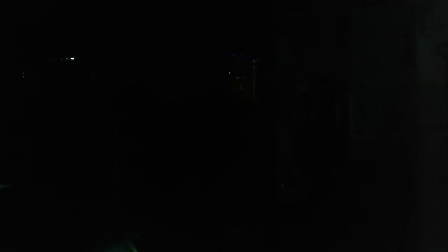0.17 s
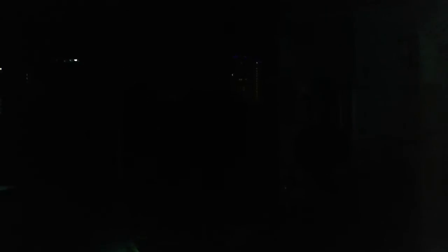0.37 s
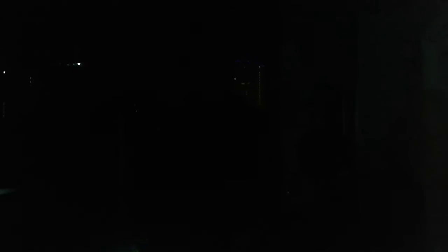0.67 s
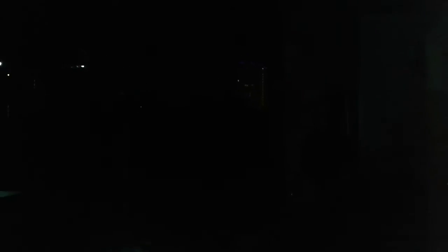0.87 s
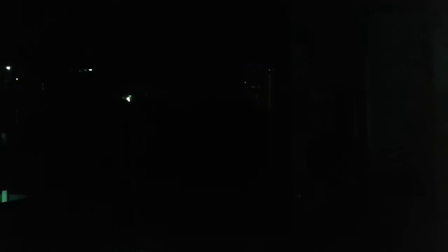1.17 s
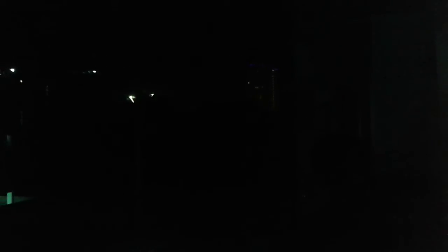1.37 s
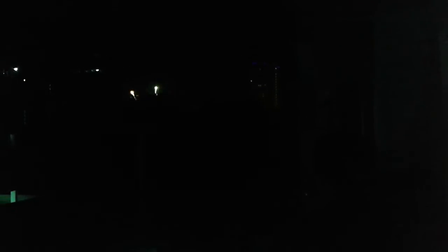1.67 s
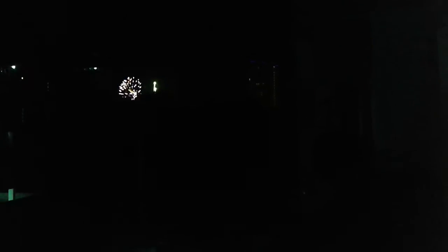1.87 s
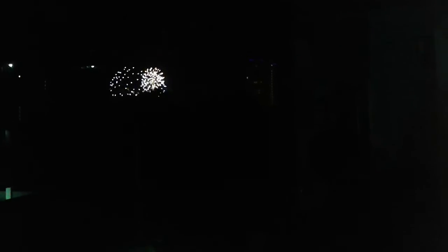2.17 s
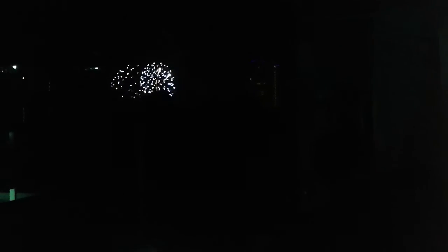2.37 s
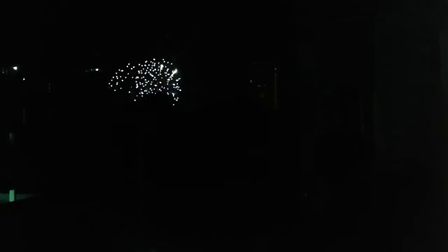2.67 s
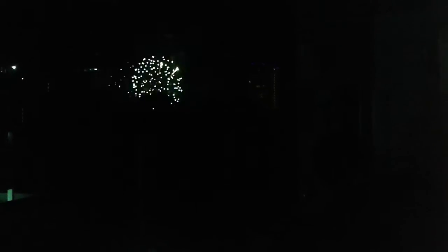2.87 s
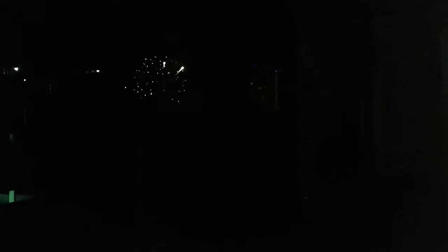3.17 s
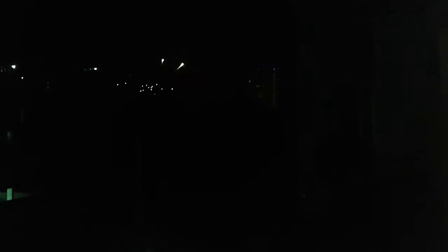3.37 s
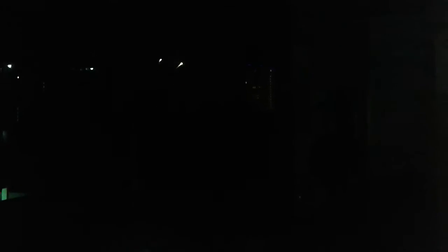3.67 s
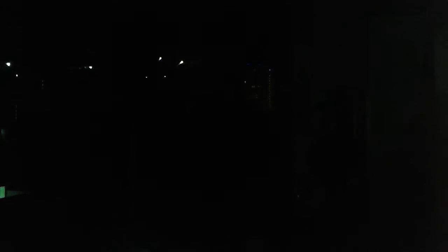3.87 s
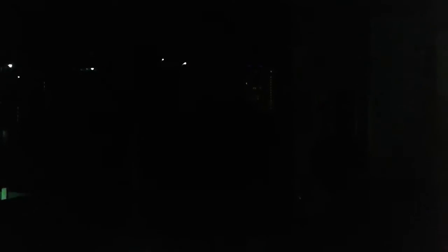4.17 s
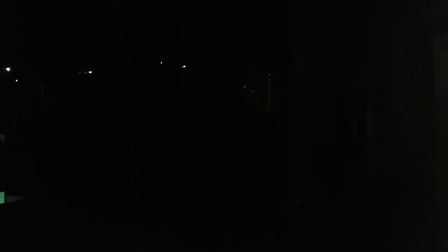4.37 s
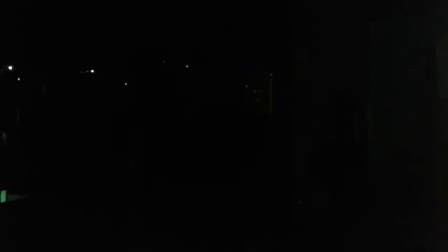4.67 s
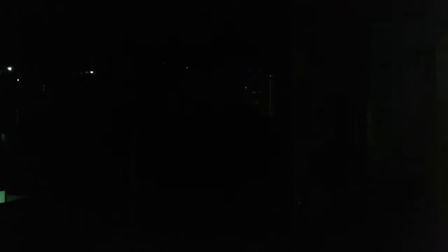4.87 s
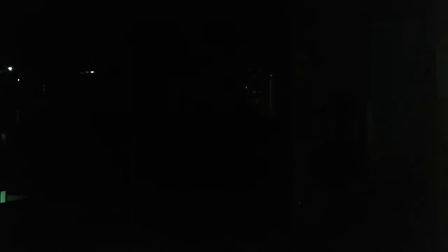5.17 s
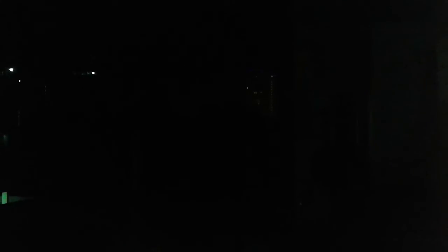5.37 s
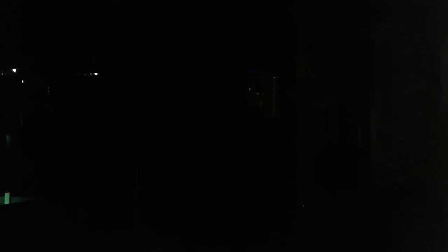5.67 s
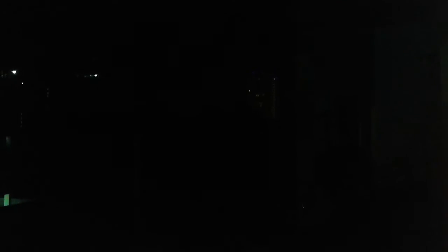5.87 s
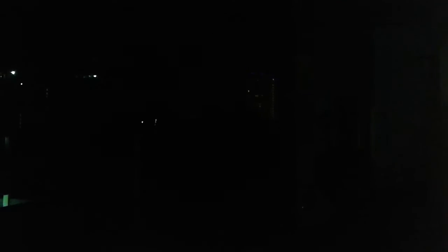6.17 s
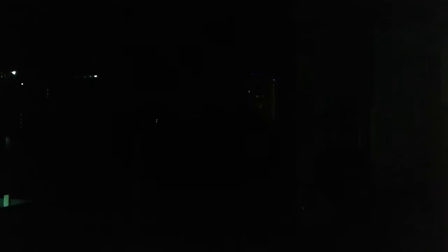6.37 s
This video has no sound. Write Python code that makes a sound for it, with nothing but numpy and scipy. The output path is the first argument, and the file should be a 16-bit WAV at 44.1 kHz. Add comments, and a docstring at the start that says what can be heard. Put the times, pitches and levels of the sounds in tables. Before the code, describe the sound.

Fireworks boom in two quick clusters, rolling away across a town and trailing into crackles, while night insects chirr softly.

```python
"""Aerial firecrackers over a town at night, heard from a porch: two volleys of three bangs, then crackling
stars. Each blast, a pressure push led by a shock front, booms in the porch, slaps back off house fronts and
rolls away between the buildings. Crickets and a katydid stroke their wings over the town's hum. The loudest
bangs overload the recorder with a treble click; its gain control ducks at the sharp peaks of loud bangs.
Fainter: stars between the volleys, dry pops and the loudest star snaps, two swells of hiss, a far whine that
stops."""
import sys
import numpy as np
from scipy import signal
from scipy.fft import rfft, irfft, next_fast_len
from scipy.io import wavfile
from scipy.ndimage import uniform_filter1d, minimum_filter1d, map_coordinates

SR = 44100
rng = np.random.default_rng(int(sys.argv[2]) if len(sys.argv) > 2 else 0)


def master_out(mix):
    """Clip the mix to full scale and print it as 16-bit PCM to the path in sys.argv[1]."""
    frames = np.transpose(np.atleast_2d(mix))
    ceiling = np.clip(frames, -1, 1)
    pcm = np.round(ceiling * 32767).astype(np.int16)
    wavfile.write(sys.argv[1], SR, pcm)


N = 287796
TIME = np.arange(N) / SR

# near crickets: (stroke rate [1/s], start [Hz], fall [Hz], duty [ratio], level [dB], echo gain [ratio])
CRICKET_SONGS = [(14.8, 6650, 820, 0.55, -57, 1.15), (14, 6450, 540, 0.59, -62, 0.66),
                 (9.5, 7500, 140, 0.49, -62, 3.1)]
# katydid wing resonance: (frequency [Hz], level [dB])
WING_SPECTRUM = [(8400, -18), (9000, -4.5), (9600, -2.5), (10300, -2.5), (11000, -6.5), (12600, -16)]
# far insects: (frequency [Hz], level [dB])
CHORUS_SPECTRUM = [(3000, -46), (5000, -32), (5700, -2.5), (6200, -5.5), (6900, -2), (7450, 1.5),
                   (8200, -20.5), (9200, -8), (10300, -6.5), (11500, -14), (13000, -17), (15000, -19)]
# town hum: (frequency [Hz], level [dB])
TOWN_SPECTRUM = [(15, -46), (25, -14), (71, -18), (126, 0), (210, -5.5), (240, -3), (327, -16), (477, -13),
                 (545, -19.5), (680, -19), (1010, -25), (1210, -27), (2200, -31), (2570, -33.5),
                 (5000, -33.5), (6500, -24), (11000, -120)]
# far whine: (frequency [Hz], level [dB])
WHINE_SPECTRUM = [(1700, -40), (2050, -15), (2170, -6), (2320, -13), (2800, -39)]
# hiss swells: (time [s], level [dB], spread [s], centre [Hz], width [octaves])
HISS_SWELLS = [(.14, -59, 0.09, 3600, 0.73), (3.56, -52, 0.085, 5800, .3)]
# bursts: (time [s], blast [dB], crack re blast [dB], push length [s], overload re blast [dB], street [dB])
BURSTS = [(0.8678, 6.5, 0.5, 0.0018, -47, 7), (0.9327, 7, 1.5, 0.0017, -44, 8),
          (1.0133, 2, 1, 0.0023, -48, 1), (4.5606, 6.5, -1, 0.0011, -30, 3.5),
          (4.786, 15, -1.5, 0.00069, -15.5, 4.5), (4.8689, 7.5, 5.5, 0.0016, -34, 7.5)]
# shock front: (frequency [Hz], level [dB])
CRACK_SPECTRUM = [(200, 3.5), (800, 11.5), (1250, -0.5), (1850, 5.5), (2900, -2.5), (4000, 2), (4800, -0.5),
                  (5900, 3), (6600, -7.5), (8000, -20.5), (12000, -51), (16000, -64)]
# treble click of the recorder overloading: (frequency [Hz], level [dB])
OVERLOAD_SPECTRUM = [(2000, -9), (6000, -11), (8000, -9), (10000, -1), (12000, -6), (15000, -11)]
# hard faces passing on the crack, small ones only short waves: (delay [s], gain [dB], low cut [Hz])
HARD_FACES = [(0, 0.5, 150), (.0017, 2.5, 200), (.005, -4.5, 1000), (0.0112, 5, 2200)]
# porch walls returning the push: (delay [s], gain [dB], high cut [Hz])
PORCH_WALLS = [(.0045, 0.5, 154), (.0059, 1.5, 152), (0.0137, 4, 156), (0.0191, -2, 172), (0.026, -7, 525),
               (.033, 1.5, 325), (.043, -2.5, 150)]
# porch air resonances: (centre [Hz], width [Hz], gain [dB])
PORCH_MODES = [(132.7, 12.4, 19), (198.6, 41.5, 12.5), (243, 8.4, 21.5), (430.2, 13, 12.5),
               (458, 4.6, 17.5), (624, 51, 13), (679, 4.95, 23.5), (1140, 16.3, 17.5), (1221, 30, 15.5)]
# porch reverberation: (frequency [Hz], level [dB])
SCATTER_SPECTRUM = [(80, -26), (200, -2.5), (450, 3.5), (700, -1), (1300, -10), (2500, -17.5), (5800, -18),
                    (7000, -27), (9000, -45.5), (16000, -85)]
# porch decay: (frequency [Hz], T60 [s])
PORCH_DECAY = [(100, 0.46), (500, 0.35), (2000, 0.25), (6000, 0.32), (12000, 0.21)]
# low far echoes: (frequency [Hz], level [dB])
RUMBLE_SPECTRUM = [(25, -37), (60, -16.5), (100, -8), (135, 0.5), (170, -3), (215, 0), (330, -14),
                   (440, -9), (540, -26), (640, -16), (900, -24.5), (1500, -30.5), (4000, -56)]
# bright street echoes: (frequency [Hz], level [dB])
WASH_SPECTRUM = [(150, -24), (450, 8), (700, 2), (1200, -2.5), (1600, -4), (2300, -7), (3000, -10),
                 (5600, -9.5), (7000, -18.5), (9000, -50), (16000, -60)]
# buildings swelling each roll: (delay [s], spread [s], rumble gain [dB], wash gain [dB])
BUILDINGS = [(.31, 0.037, 5.5, 11), (.74, 0.16, 2, 2), (1.8, 0.29, 3, -2)]
# house-front echoes: (time [s], level [dB], spread [s])
HOUSE_SLAPS = [(1.147, -14, 0.0075), (1.277, -13.5, 0.0046), (1.571, -27, 0.0042), (5.018, -18.5, 0.0039),
               (5.073, -21, 0.004), (5.149, -10, 0.0052)]
# star clouds: (peak time [s], level [dB], rise [dB/s], fall [dB/s])
STAR_CLOUDS = [(2.87, -52.5, 13, 26), (6.17, -33, 29.5, 33.5)]
# star snaps: (frequency [Hz], level [dB])
PATTER_SPECTRUM = [(290, -50), (500, -7), (660, -4), (793, -4.5), (984, -8.5), (1150, -4.5), (1580, -10.5),
                   (1840, -5), (2300, -7.5), (5800, -21), (7540, -66), (12800, -120)]
# dry pops, the later ones the loudest snaps of the star cloud: (time [s], level [dB])
DRY_POPS = [(3.524, -45), (3.5511, -37.5), (5.903, -33.5), (6.205, -33), (6.216, -29.5)]
# one pop: (frequency [Hz], level [dB])
POP_SPECTRUM = [(300, -15), (700, 1), (1400, 4), (2500, -11), (3700, -5), (6000, -3.5), (7500, -15),
                (14000, -21)]


def amp(db):
    """Decibels to gain."""
    return 10 ** (np.asarray(db) / 20)


def unit(x):
    """Scale to rms 1."""
    return x / np.sqrt(np.mean(x ** 2) + 1e-20)


def along(points, hz):
    """Interpolate (Hz, value) points on a log axis."""
    knots_hz, values = np.transpose(points)
    return np.interp(np.log(hz + 1), np.log(knots_hz + 1), values)


def wobble(knots_per_s):
    """Smooth random curve."""
    return map_coordinates(rng.standard_normal(int(N * knots_per_s / SR) + 4), [TIME * knots_per_s])


def filtered(x, response):
    """Apply a complex frequency response."""
    size = next_fast_len(len(x) + SR // 2)
    return irfft(rfft(x, size) * response(np.fft.rfftfreq(size, 1 / SR)), size)[:len(x)]


def coloured(x, spectrum):
    """Shape by a spectrum, rms 1."""
    return unit(filtered(x, lambda hz: amp(along(spectrum, hz))))


def noise(spectrum, size=N):
    """Coloured noise, rms 1."""
    return coloured(rng.standard_normal(size), spectrum)


def blurred(x, t60_s=0.12):
    """Short diffuse echo."""
    t = np.arange(SR // 4) / SR
    return signal.fftconvolve(x, rng.standard_normal(len(t)) * amp(-60 * t / t60_s))[:N]


def add(track, time_s, sound):
    """Mix a sound into the track."""
    start = max(round(time_s * SR), 0)
    track[start:start + len(sound)] += sound[:len(track) - start]


def cricket(strokes_per_s, start_hz, fall_hz, duty, db, echo_gain):
    """Each wing stroke is a falling note of its own pitch and strength, blurred by the surroundings."""
    strokes = np.cumsum(strokes_per_s * (1 + .07 * wobble(5))) / SR
    detune, effort = rng.standard_normal((256, 2))[strokes.astype(int)].T
    progress = np.minimum(strokes % 1 / duty, 1)
    pitch_hz = start_hz + 70 * detune - fall_hz * progress + 35 * wobble(300)
    envelope = np.sin(np.pi * progress) * amp(2 * effort)
    song = envelope * np.sin(2 * np.pi * np.cumsum(pitch_hz) / SR)
    return amp(db) * unit(unit(song) + echo_gain * unit(blurred(song)))


def katydid(strike_hz=196.2, level_db=-59.5, jitter_hz=0.49, blur_rad=0.84):
    """Fast regular tooth strikes on a high wing resonance."""
    phase = 2 * np.pi * np.cumsum(strike_hz + 0.25 * wobble(3) + jitter_hz * wobble(400)) / SR
    buzz = sum(amp(along(WING_SPECTRUM, k * strike_hz)) * np.sin(k * phase + rng.normal(0, blur_rad))
               for k in range(44, 64))
    return amp(level_db + 0.82 * wobble(2.03)) * unit(buzz)


def night(chorus_db=-55.0, town_db=-45):
    """Near insects, far insect chorus, town hum."""
    near = sum(cricket(*song) for song in CRICKET_SONGS) + katydid()
    chorus_sway_db, town_sway_db = .6 * wobble(3), .8 * wobble(4)
    chorus = amp(chorus_db + chorus_sway_db) * noise(CHORUS_SPECTRUM)
    town = amp(town_db + town_sway_db) * noise(TOWN_SPECTRUM)
    return near + chorus + town


def whine(level_db=-67, stop_s=3.75, fade_s=0.065):
    """A far narrow whine holds steady, then stops."""
    running = np.clip((stop_s - TIME) / fade_s, 0, 1)
    return running * amp(level_db) * noise(WHINE_SPECTRUM)


def hisses():
    """Soft bands of hiss swell and ebb."""
    out = np.zeros(N)
    for time_s, db, spread_s, centre_hz, octaves in HISS_SWELLS:
        band = filtered(rng.standard_normal(N),
                        lambda hz: np.exp(-.5 * (np.log2((hz + 1) / centre_hz) / octaves) ** 2))
        out += amp(db) * np.exp(-.5 * ((TIME - time_s) / spread_s) ** 2) * unit(band)
    return out


def click(spectrum, size=1024):
    """Minimum-phase pulse, peak 1."""
    cepstrum = irfft(np.log(amp(along(spectrum, np.fft.rfftfreq(size, 1 / SR)))))
    cepstrum[1:size // 2] *= 2
    cepstrum[size // 2 + 1:] = 0
    pulse = irfft(np.exp(rfft(cepstrum)))
    return pulse / np.abs(pulse).max()


def walls(hz, shadow_hz=600):
    """Direct path plus dull wall returns; only long waves bend round corners."""
    returns = sum(amp(db) * np.exp(-2j * np.pi * hz * delay_s) / (1 + 1j * hz / cut_hz)
                  for delay_s, db, cut_hz in PORCH_WALLS)
    return 1 + returns / np.sqrt(1 + (hz / shadow_hz) ** 4)


def porch(hz):
    """Direct path plus the porch's air resonances."""
    return 1 + sum(amp(db) * 1j * hz * width_hz / (centre_hz ** 2 - hz ** 2 + 1j * hz * width_hz)
                   for centre_hz, width_hz, db in PORCH_MODES)


def scatter(rise_s=0.001, spread_db=5.684):
    """Porch reverberation: a few strong reflections among many weak; bass lasts longest."""
    size = SR // 2
    reflections = rng.standard_normal(size) * amp(spread_db * rng.standard_normal(size))
    hz, t, bands = signal.stft(coloured(reflections, SCATTER_SPECTRUM), SR, nperseg=256)
    decay = amp(-60 * t / along(PORCH_DECAY, hz)[:, None])
    tail = signal.istft(bands * decay, SR)[1][:size]
    return tail * (1 - np.exp(-np.arange(size) / SR / rise_s))


def bangs(push_db=-9, crack_db=-8, scatter_db=-23.0, fresh_gain=0.49, low_cut_hz=90):
    """Each burst: shock front, pressure push, suction behind it; overload click at a set level."""
    out, t = np.zeros(N), np.arange(SR // 2) / SR
    front, shared_tail = np.zeros(len(t)), scatter()
    air_lowpass = signal.butter(6, 5000, fs=SR, output="sos")
    for delay_s, db, cut_hz in HARD_FACES:
        reflection = filtered(click(CRACK_SPECTRUM), lambda hz: 1j * hz / (1j * hz + cut_hz))
        add(front, delay_s, amp(db) * reflection)
    for time_s, db, sharp_db, length_s, overload_db, _ in BURSTS:
        push = (1 - t / length_s) * np.exp(-t / length_s)
        boom = filtered(push, lambda hz: walls(hz) * porch(hz) * (1j * hz / (1j * hz + low_cut_hz)) ** 2)
        boom = amp(push_db) * signal.sosfilt(air_lowpass, boom)
        crack = amp(crack_db + sharp_db) * front
        tail = shared_tail + fresh_gain * scatter()  # same porch, new direction
        add(out, time_s, amp(db) * (boom + crack + amp(scatter_db + sharp_db / 2) * tail))
        add(out, time_s, amp(db + overload_db) * click(OVERLOAD_SPECTRUM))
    return out


def echo_db(age_s, start_db, half_s, loss_db_per_s):
    """Echo level after spreading and absorption along the path."""
    return start_db - 20 * np.log10(1 + age_s / half_s) - loss_db_per_s * age_s


def roll(rise_s=0.032, rumble_lumps_db=1.58, wash_lumps_db=1.25):
    """Countless far echoes of each bang: long uneven rumble, brighter wash absorbed faster."""
    t = TIME[::64]
    power = np.zeros((2, len(t)))
    for time_s, *_, street_db in BURSTS:
        age_s = np.maximum(t - time_s, 0)
        db = np.array([echo_db(age_s, start_db=-24.3, half_s=.15, loss_db_per_s=3.5),  # rumble
                       echo_db(age_s, start_db=-40, half_s=0.81, loss_db_per_s=11.5)])  # wash
        for delay_s, spread_s, rumble_db, wash_db in BUILDINGS:
            db += np.outer([rumble_db, wash_db], np.exp(-.5 * ((age_s - delay_s) / spread_s) ** 2))
        power += (amp(street_db + db) * (1 - np.exp(-age_s / rise_s))) ** 2
    rumble_gain, wash_gain = (np.interp(TIME, t, np.sqrt(row)) for row in power)
    rumble = rumble_gain * amp(rumble_lumps_db * wobble(18)) * noise(RUMBLE_SPECTRUM)
    wash = wash_gain * amp(wash_lumps_db * wobble(45)) * noise(WASH_SPECTRUM)
    return rumble + wash


def slaps():
    """Broken house fronts return the bangs smeared."""
    out, t = np.zeros(N), np.arange(SR // 8) / SR
    for time_s, db, spread_s in HOUSE_SLAPS:
        envelope = t / spread_s * np.exp(-t / spread_s)
        add(out, time_s, amp(db) * envelope * noise(WASH_SPECTRUM, len(t)))
    return out


def stars(snaps_per_s=900, size_spread_db=4.5, blur_gain=0.32, wash_db=-9):
    """Far clouds of tiny charges; snaps blur and ring faintly in the porch, wash round the streets."""
    envelope = sum(amp(db - np.maximum(rise * (peak_s - TIME), fall * (TIME - peak_s)))
                   for peak_s, db, rise, fall in STAR_CLOUDS)
    snaps = (rng.random(N) < snaps_per_s / SR) * amp(size_spread_db * rng.standard_normal(N))
    blur = blurred(snaps)
    ringing = filtered(unit(snaps) + blur_gain * unit(blur), lambda hz: porch(hz) ** 0.32)
    return envelope * (coloured(ringing, PATTER_SPECTRUM) + amp(wash_db) * coloured(blur, WASH_SPECTRUM))


def pops(t60_s=0.024):
    """Small dry pops between the volleys, and the loudest snaps of the star cloud."""
    out, t = np.zeros(N), np.arange(SR // 8) / SR
    for time_s, db in DRY_POPS:
        add(out, time_s, amp(db - 60 * t / t60_s) * noise(POP_SPECTRUM, len(t)))
    return out


def scene():
    """Mono sum at the porch."""
    return (bangs() + slaps() + roll() + stars() + pops() + night() + whine() + hisses())[None]


def record(dry, bang_ceiling=0.61, hold_s=0.29, release_s=0.4, peak_ceiling=.68, top_hz=15100):
    """Gain control ducks at the sharp peaks of loud bangs, holds, releases; fast limiter catches what gets
    past; band limit."""
    x = dry[0]
    bang_level = np.abs(uniform_filter1d(x, size=20))
    needed = np.minimum(1, bang_ceiling / (bang_level + 1e-9))
    hold_n, release_n = int(hold_s * SR), int(release_s * SR)
    held = minimum_filter1d(needed, hold_n, origin=(hold_n - 1) // 2)
    released = np.exp(uniform_filter1d(np.log(held), release_n, origin=(release_n - 1) // 2))
    ducked = x * uniform_filter1d(np.minimum(held, released), size=24)
    peak_gain = minimum_filter1d(np.minimum(1, peak_ceiling / (np.abs(ducked) + 1e-9)), size=25)
    limited = ducked * uniform_filter1d(peak_gain, size=25)
    return filtered(limited, lambda hz: hz < top_hz)[None]


dry = scene()
out = record(dry)
master_out(out)
```